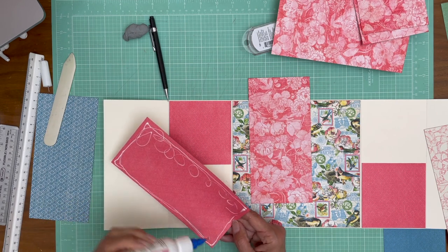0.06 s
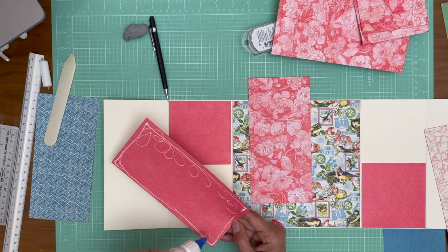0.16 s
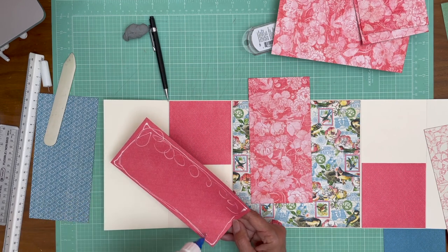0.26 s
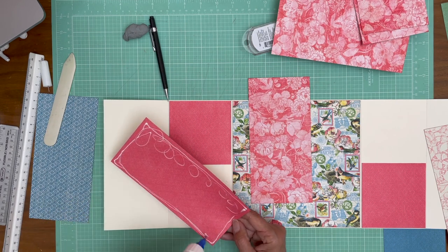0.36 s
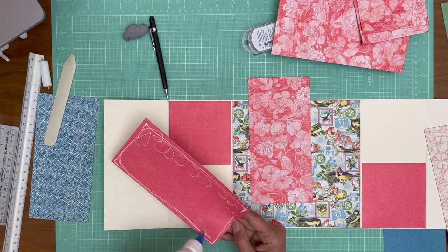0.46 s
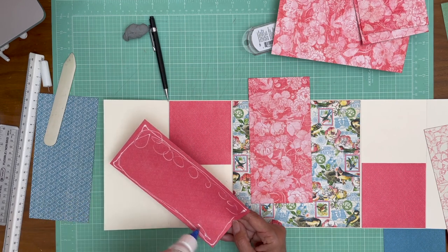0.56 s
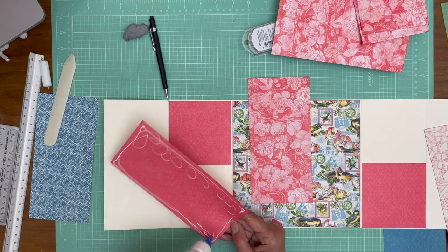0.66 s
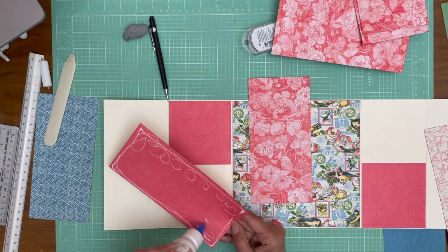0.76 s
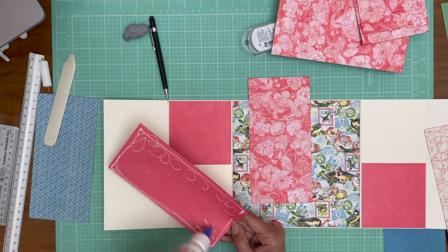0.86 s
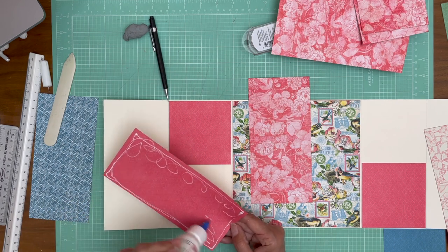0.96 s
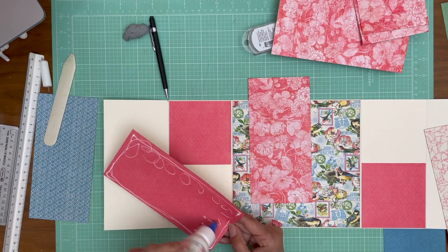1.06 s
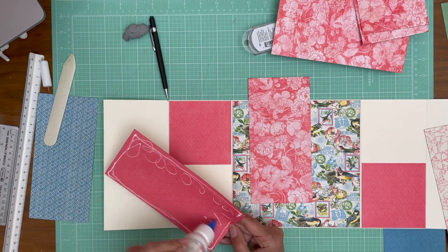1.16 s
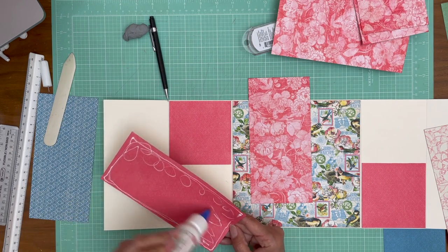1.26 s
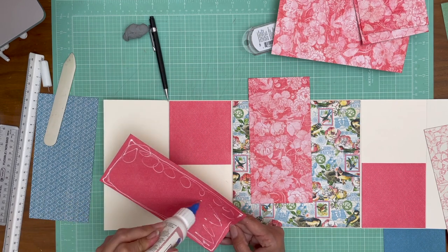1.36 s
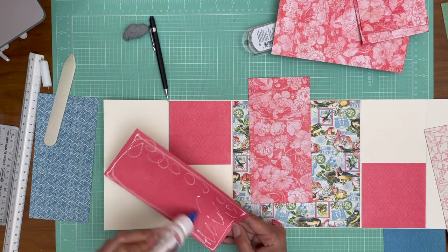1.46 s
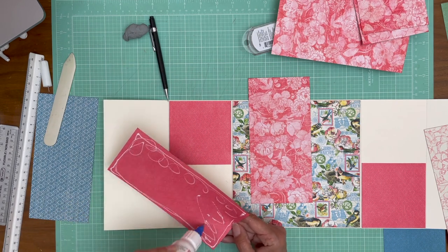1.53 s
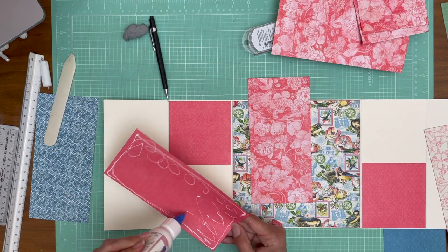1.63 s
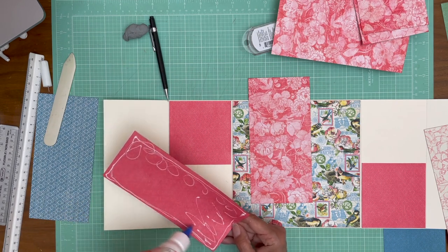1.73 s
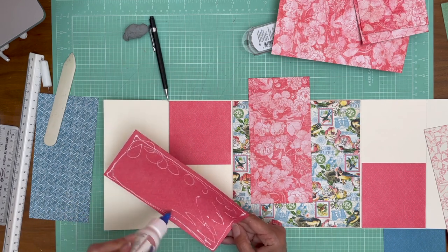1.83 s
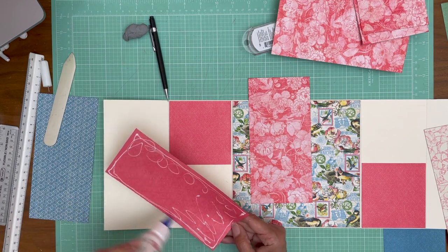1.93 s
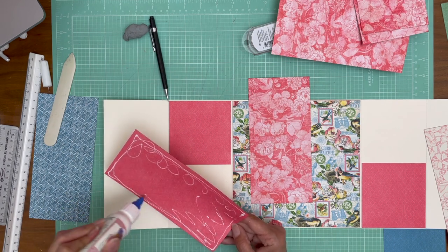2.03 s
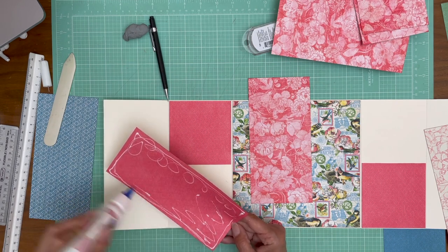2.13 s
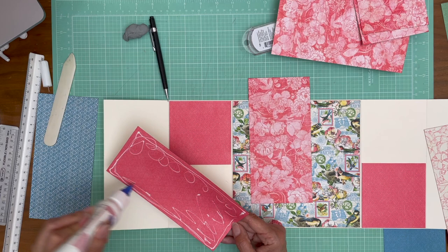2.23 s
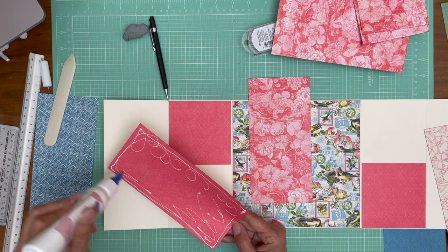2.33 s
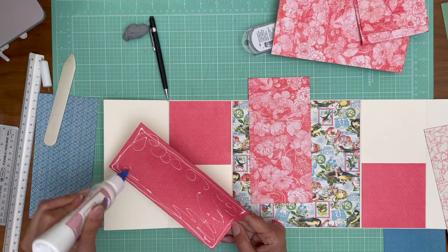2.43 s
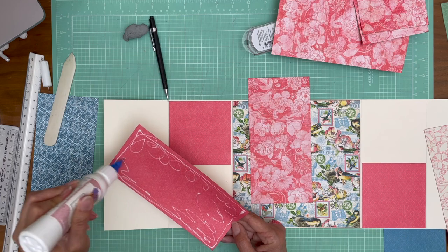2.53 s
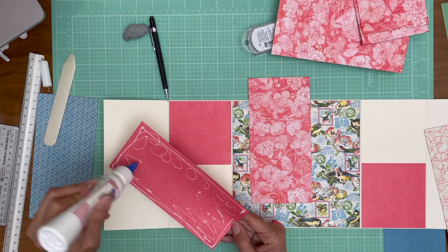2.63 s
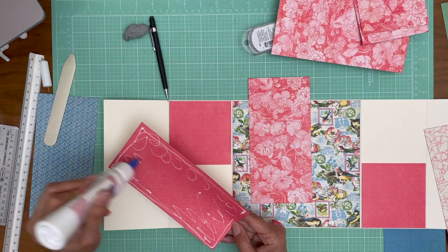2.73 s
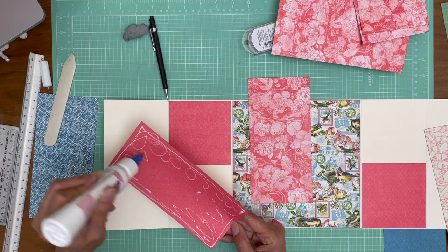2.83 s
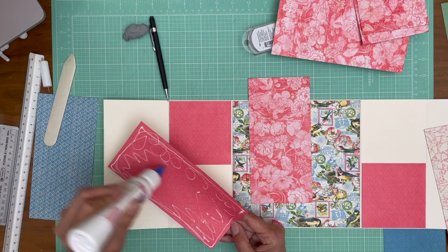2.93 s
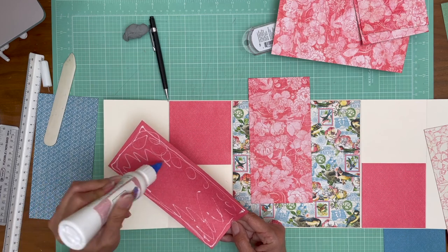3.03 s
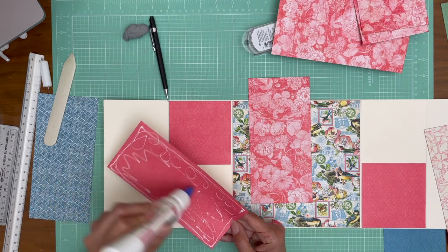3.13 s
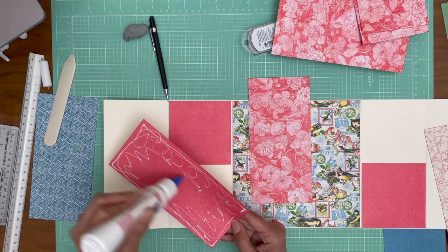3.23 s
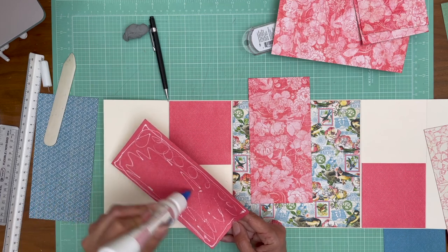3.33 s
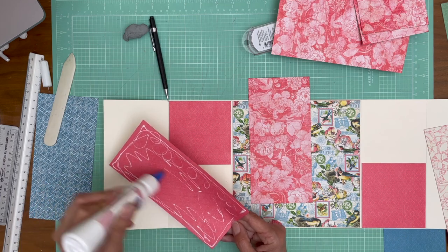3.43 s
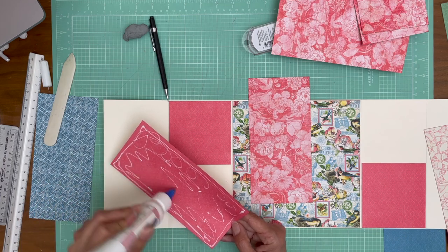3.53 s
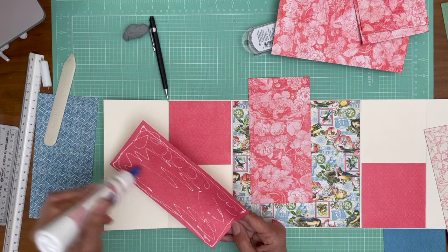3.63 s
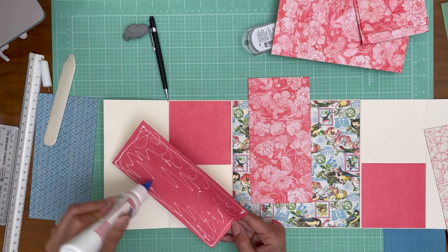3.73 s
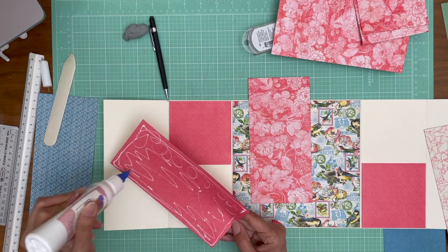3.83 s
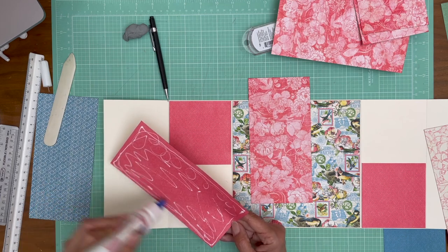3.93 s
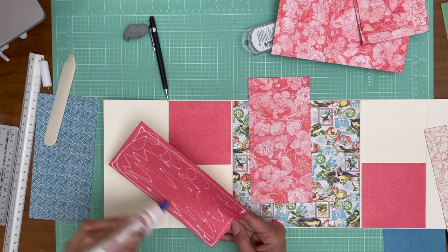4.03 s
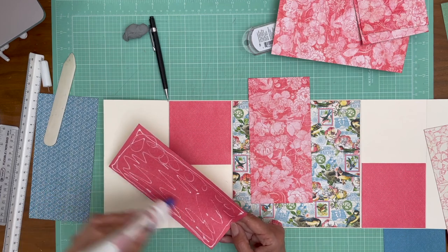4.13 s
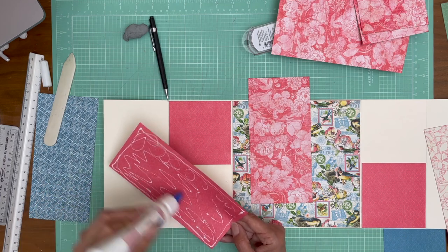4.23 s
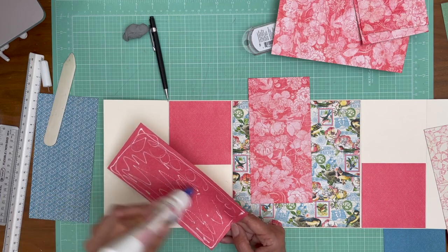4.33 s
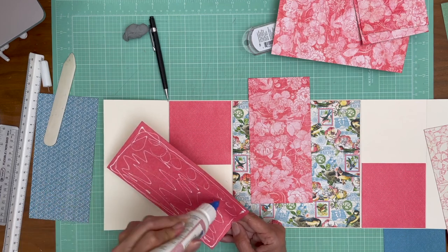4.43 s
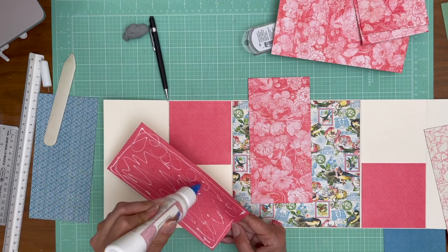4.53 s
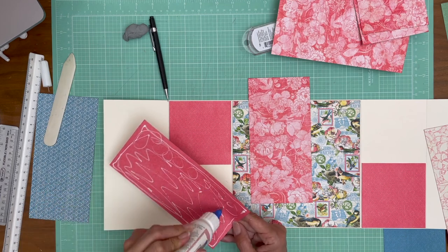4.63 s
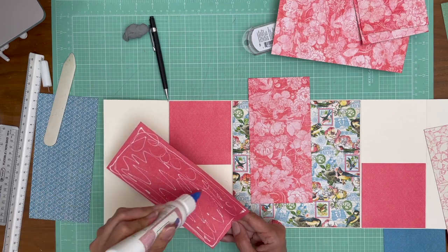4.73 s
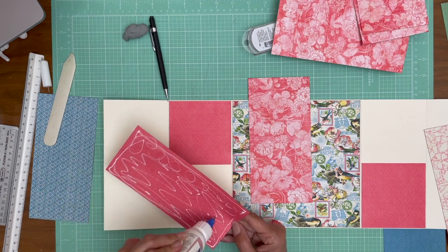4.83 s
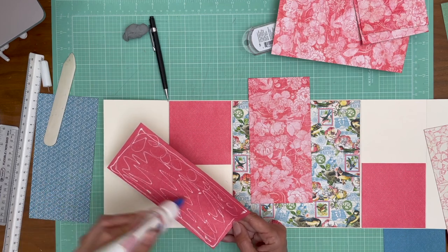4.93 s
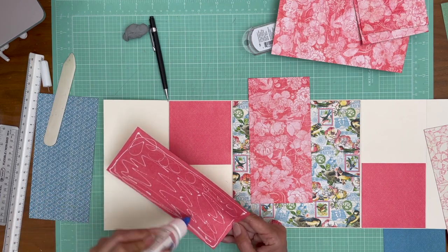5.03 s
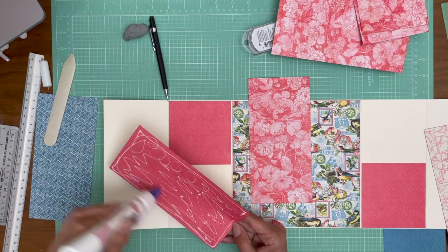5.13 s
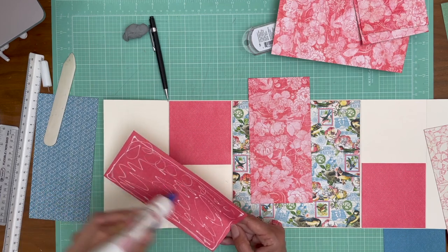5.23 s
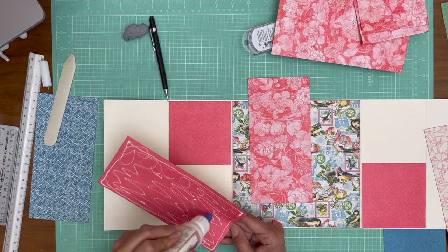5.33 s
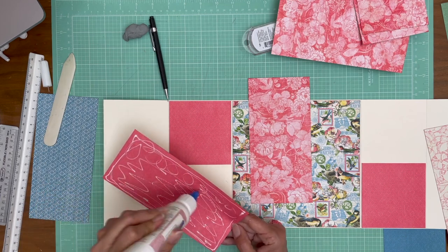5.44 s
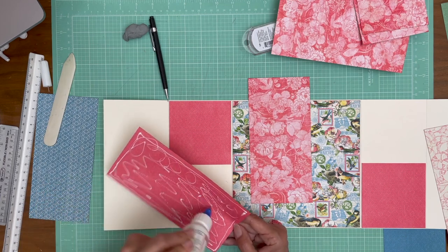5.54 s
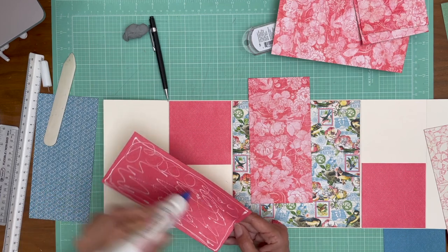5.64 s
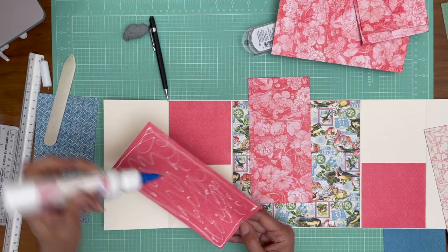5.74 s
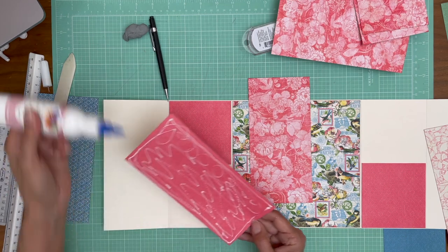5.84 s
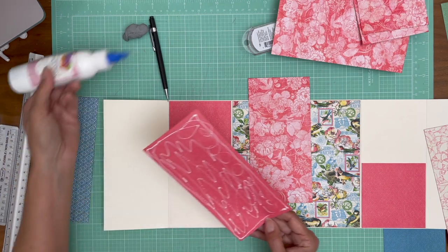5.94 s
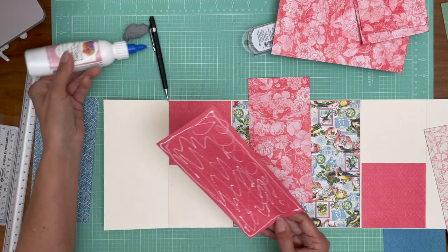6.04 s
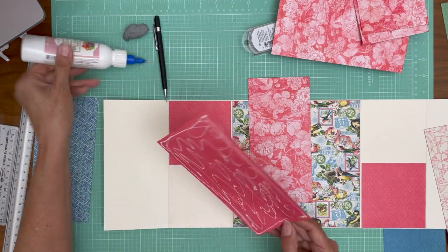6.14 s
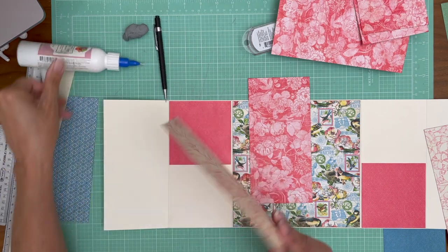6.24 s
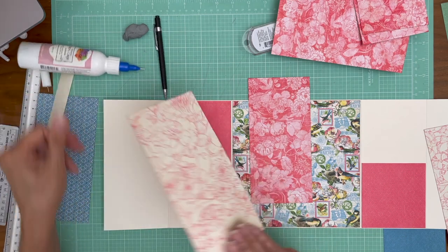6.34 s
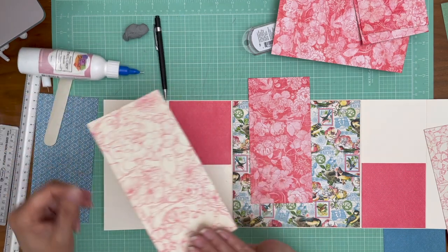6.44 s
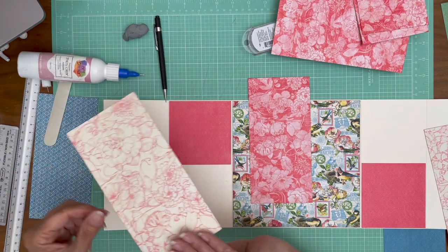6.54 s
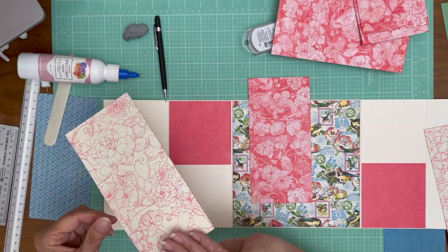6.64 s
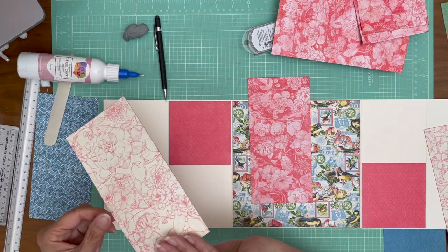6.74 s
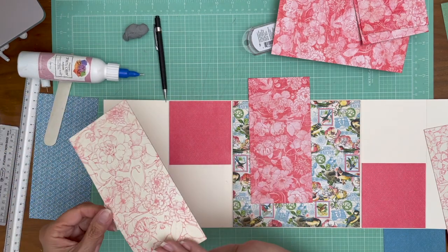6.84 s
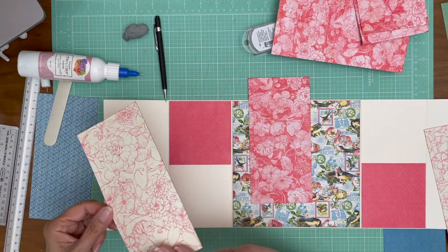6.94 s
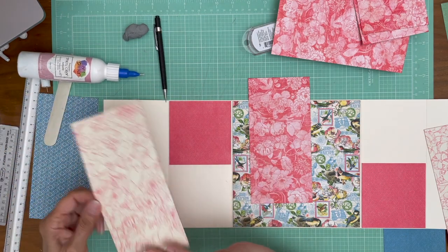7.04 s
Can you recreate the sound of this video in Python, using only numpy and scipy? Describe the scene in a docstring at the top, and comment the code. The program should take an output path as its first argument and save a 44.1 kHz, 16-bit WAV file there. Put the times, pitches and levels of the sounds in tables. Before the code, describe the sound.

Rapid dry scratching of a glue bottle tip on card in a quiet room, ending with a clattering set-down and light paper handling.

```python
"""A craft table in a quiet small room, heard from above by a pair of close microphone ports.
A fine plastic bottle tip scribbles glue over a strip of card, about ten short strokes a second: noise through
resonances, driven by the speed of the tip. The bottle is then laid on a hard folding tool: a touch, a thud and
three sharp knocks, made of ringing modes, chatter and short noise. Hands and card rustle, and light taps tick."""
import sys
import numpy as np
from scipy import signal
from scipy.fft import rfft, irfft, next_fast_len
from scipy.io import wavfile
from scipy.ndimage import uniform_filter1d

SR = 44100
rng = np.random.default_rng(int(sys.argv[2]) if len(sys.argv) > 2 else 0)


def materialize(psi):
    """Save the field psi as 16-bit PCM at rate SR to the path in sys.argv[1].

    A 1-D psi becomes a single channel; in a 2-D psi each row is a channel.
    """
    bounded = np.clip(np.atleast_2d(psi).T, -1, 1)
    quanta = np.round(bounded * 32767).astype(np.int16)
    wavfile.write(sys.argv[1], SR, quanta)


N = 312669  # length in samples


def amp(db):
    """Turn decibels into a gain."""
    return 10 ** (np.asarray(db) / 20)


def rms_one(x):
    """Scale a sound to an average (rms) strength of 1."""
    return x / np.sqrt(np.mean(x ** 2) + 1e-20)


def low_pass(x, order, hz):
    """Keep what lies below a frequency."""
    return signal.sosfilt(signal.butter(order, hz, fs=SR, output="sos"), x)


def high_pass(x, order, hz):
    """Keep what lies above a frequency."""
    return signal.sosfilt(signal.butter(order, hz, "high", fs=SR, output="sos"), x)


def drift(rate):
    """Wander at random with spread 1, heading for a new value about rate times a second."""
    knots = rng.standard_normal(int(N / SR * 60) + 2)
    position = np.arange(N) / SR * np.clip(rate, 1, 59)
    return np.interp(position, np.arange(len(knots)), knots)


def through(x, gain_at):
    """Filter by a gain, possibly complex, given as a function of frequency."""
    size = next_fast_len(N + SR)
    hz = np.arange(size // 2 + 1) * SR / size + 1e-3
    return irfft(rfft(x, size) * gain_at(hz), size)[..., :N]


def catches(per_s, spread_db):
    """Tiny random catches and releases on paper fibres; a wider spread adds a few large ones."""
    sizes = amp(spread_db * np.minimum(rng.exponential(1, N), 5)) * rng.standard_normal(N)
    return sizes * (rng.random(N) < per_s / SR) + 1e-18


def resonate(x, modes, shifting_db, glide=1):
    """Resonances side by side, retuned together by glide; their balance shifts while loudness stays steady."""
    out, glide = 0, glide * np.ones(N)
    for k, (hz, width_hz, level_db) in enumerate(modes):
        r, tone, state = np.exp(-np.pi * width_hz / SR), np.zeros(N), np.zeros(2)
        for i in range(0, N, 512):  # retune block by block
            poles = [1, -2 * r * np.cos(2 * np.pi * hz * glide[i] / SR), r * r]
            tone[i:i + 512], state = signal.lfilter([1 - r * r, 0, r * r - 1], poles, x[i:i + 512], zi=state)
        level = amp(level_db + shifting_db * drift(25.0))
        out = out + (-1) ** k * level * tone
    return out / np.sqrt(uniform_filter1d(out ** 2, size=SR // 40) + 1e-20)


def ring(clicks, hz, t60):
    """A click of size 1 sets off a sine of about height 1 that fades by 60 dB in t60 seconds."""
    r, w = amp(-60 / (t60 * SR)), 2 * np.pi * hz / SR
    return signal.lfilter([0, np.sin(w)], [1, -2 * r * np.cos(w), r * r], clicks + 1e-18)


def struck(times_s, gains):
    """Single clicks at given moments."""
    clicks = np.zeros(N)
    clicks[np.round(np.asarray(times_s) * SR).astype(int)] = gains
    return clicks


def dying(clicks, t60):
    """An envelope that jumps at each click and dies away."""
    return signal.lfilter([1], [1, -amp(-60 / (t60 * SR))], clicks + 1e-18)


STEADINESS = 2.3  # higher keeps the speed flatter in mid-movement


def hump(s, half_ms):
    """Speed of one hand movement: up, steady, down."""
    near = slice(max(int((s - .3) * SR), 0), min(int((s + .3) * SR), N))
    t = np.arange(near.start, near.stop) / SR
    return near, t, np.exp(-np.abs(1000 * (t - s) / half_ms) ** STEADINESS)


# tone colour of the quiet room: f/Hz, relative level/dB
QUIET_COLOUR = [(25, -48.5), (45, 4), (70, -4.5), (110, -0.5), (170, -10), (300, -8), (700, -17),
                (1500, -27), (4000, -34.5), (9000, -41), (13000, -28)]
# table shaking under the hands: t/s, low rumble level/dB relative to its plain level
TABLE_SHAKING = [(0, 4.5), (2.3, 3), (2.9, 10.5), (3.1, 5), (4.9, 3), (5.75, 8.5), (6.0, 2.5), (6.151, 15),
                 (6.55, 8.5), (6.97, 0.5), (7.04, 18), (7.09, 5)]
ROOM_TONE_DB, TONE_UNSHARED, RUMBLE_TOP_HZ = -50, 1, 252  # unshared: each port's own noise against the common one


def room_tone():
    """Low rumble of the room, stronger when the strokes and knocks shake the table, and faint hiss: partly
    shared noise at the two ports."""
    hz, level_db = np.transpose(QUIET_COLOUR)
    white = rng.standard_normal(N) + TONE_UNSHARED * rng.standard_normal((2, N))
    tone = rms_one(through(white, lambda f: amp(np.interp(np.log(f), np.log(hz), level_db))))
    low = through(tone, lambda f: 1 / (1 + (f / RUMBLE_TOP_HZ) ** 4))
    shaking_db = np.interp(np.arange(N) / SR, *np.transpose(TABLE_SHAKING))
    wandering = amp(ROOM_TONE_DB + 0.5 * drift(1.5))
    return wandering * (tone + (amp(shaking_db) - 1) * low)


ROOM_T60_S, ROOM_CUT_HZ = 0.26, 4220  # time to fade by 60 dB; treble limit


def room(x):
    """Scattered reflections, different at each port, dull and dying evenly."""
    t = np.arange(SR // 2) / SR
    echoes = rng.standard_normal((2, len(t))) * amp(-60 * t / ROOM_T60_S) * (t > .002)
    echoes = low_pass(echoes, 2, ROOM_CUT_HZ)
    echoes /= np.sqrt(np.sum(echoes ** 2, axis=1, keepdims=True))
    return signal.fftconvolve(x[None], echoes, axes=1)[:, :N]


SHARED_BELOW_HZ = 280


def alike_in_bass(pair):
    """Long waves reach both ports alike, so remove the left-right difference in the bass."""
    side = high_pass((pair[0] - pair[1]) / 2, 2, SHARED_BELOW_HZ)
    return (pair[0] + pair[1]) / 2 + side * [[1], [-1]]


# hands and card brushing: middle t/s, half length/ms, bright rustle level/dB, dull rub level/dB
BRUSHES = [(.03, 130, -52.5, -59), (.098, 19, -44, -78), (5.68, 83, -45, -51), (5.78, 38, -41.5, -51),
           (5.928, 95, -48, -55.5), (6.031, 80, -69, -46.5), (6.1, 36, -42, -47), (6.169, 48, -43, -41.5),
           (6.82, 21, -58, -54), (6.95, 55, -64.5, -58), (7.034, 38.5, -41, -54)]
# colours of the bright rustle and the dull rub: f/Hz, width/Hz, relative level/dB
BRIGHT_MODES = [(3830, 2000, -6), (7150, 210, 3), (10600, 4200, -3.5), (13100, 2300, -1)]
DULL_MODES = [(450, 930, -2), (774, 770, 6), (1050, 280, 2), (1640, 300, -12.5)]


def rustle():
    """Skin and card sliding: bright grains and a duller rub, both following the speed of the hand."""
    power = np.zeros((2, N))
    for s, half_ms, bright_db, rub_db in BRUSHES:
        near, _, speed = hump(s, half_ms)
        power[:, near] += (amp([[bright_db], [rub_db]]) * speed) ** 2
    bright = resonate(catches(11000.0, 1.4), BRIGHT_MODES, 0.4)
    rub = resonate(catches(3300.0, 1.4), DULL_MODES, 4.8)
    return np.sum(np.sqrt(power) * [bright, rub], axis=0)


# light taps on the card: t/s, level/dB of the main pitch, main pitch f/Hz
LIGHT_TAPS = [(.925, -35, 1520), (6.751, -40, 1530), (6.758, -38, 1480), (6.802, -29.5, 1510),
              (7.032, -30.5, 560), (7.034, -38, 1770)]


def taps():
    """Short damped ticks at the card's pitch, with an undertone and two overtones, softened by the contact."""
    ticks = np.zeros(N)
    for s, level_db, hz in LIGHT_TAPS:
        click = struck([s], amp(level_db))
        for ratio, share in [(.45, -0.67), (1, 1), (1.95, 0.16), (2.7, -0.11)]:
            ticks += share * ring(click, ratio * hz, 23.0 / hz)  # fades by 60 dB in 23 cycles of the main pitch
    return low_pass(ticks, 2, 7000)


# the bottle slides on the tool: middle t/s, half length/ms, level/dB
BOTTLE_SLIDES = [(6.01, 37, -50)]
# what the slide sets singing: f/Hz, width/Hz, relative level/dB
SINGING_MODES = [(1630, 110, 0), (3250, 90, -8), (4400, 90, -3)]


def slide():
    """The bottle brushes the tool before it lands: steady noise makes a few thin modes sing faintly."""
    gain = np.zeros(N)
    for s, half_ms, level_db in BOTTLE_SLIDES:
        near, _, speed = hump(s, half_ms)
        gain[near] += amp(level_db) * speed
    return gain * resonate(rng.standard_normal(N), SINGING_MODES, 1)


# bottle against tool and table:
# t/s, relative blow level/dB, favoured pitch f/Hz, table thud level/dB, relative crack level/dB
BLOWS = [(6.03, -33, 2570, -39, -30), (6.067, -15.5, 573, -26, -12), (6.225, -2.5, 493, -20.5, -19),
         (6.247, -0.5, 1520, -8.5, 3), (6.331, 2, 2410, -10, 2.5), (6.373, -5.5, 2700, -10, -1),
         (6.378, -0.5, 5330, -34.5, 3)]
# ringing of bottle and tool: f/Hz, level/dB when struck, 60 dB fading time/s, level/dB when chattering
BOTTLE_MODES = [(350, 4, 0.04, 4), (424, 4, 0.047, 4), (565, 1.5, 0.02, 3), (945, 4, 0.05, 6),
                (1223, 10, 0.015, 6), (1480, 8, 0.024, 4), (1760, 4.5, 0.023, 7), (2490, 12, 0.022, 0),
                (2820, -3, 0.03, 2), (3330, 3, 0.035, 3), (4265, -2, 0.04, 2), (4700, 8, 0.016, -4),
                (5370, 4, 0.05, 2), (6400, -3, 0.045, 2)]
# ringing of the table: f/Hz, relative level/dB, 60 dB fading time/s
TABLE_MODES = [(96, -9, 0.15), (165, -7, 0.071), (237, 3.5, 0.06)]
CLATTER_PER_S, CLATTER_DB, CLATTER_T60_S = 700, -18.5, 0.29  # the bottle chatters on after each blow
RATTLE_DAMPING = 0.38  # loose chatter rings for this share of the free fading time
THUD_MS, TABLE_LOW_HZ = 6.1, 62  # length of the push on the table; little is radiated below this pitch
CRACK_T60_S = 0.015
SIZZLE_DB, SIZZLE_T60_S, SIZZLE_LOW_HZ = -25, 0.21, 8980  # the crack leaves a thin bright tail


def knocks():
    """Every blow strikes the same modes, those near its favoured pitch hardest; then clatter, thud and crack."""
    s, blow_db, favoured_hz, thud_db, crack_db = np.transpose(BLOWS)
    out, chatter = np.zeros(N), rng.random(N) < CLATTER_PER_S / SR
    for k, (hz, level_db, t60, loose_db) in enumerate(BOTTLE_MODES):
        octaves_away = np.log2(hz / favoured_hz)
        blows = (-1) ** k * struck(s, amp(blow_db - 16.5 - 5.3 * octaves_away ** 2))
        fading = amp(CLATTER_DB + loose_db) * dying(blows, CLATTER_T60_S)
        rattle = fading * chatter * rng.standard_normal(N)
        out += amp(level_db) * ring(blows, hz, t60) + ring(rattle, hz, RATTLE_DAMPING * t60)

    push = np.hanning(int(THUD_MS / 1000 * SR))
    thuds = signal.fftconvolve(struck(s, amp(thud_db)), push / push.sum())[:N]
    out += sum(amp(level_db) * ring(thuds, hz, t60) for hz, level_db, t60 in TABLE_MODES)
    out = high_pass(out, 3, TABLE_LOW_HZ)

    cracks, noise = struck(s, amp(crack_db)), rng.standard_normal(N)
    crack = 0.66 * dying(cracks, CRACK_T60_S) * noise
    sizzle = amp(SIZZLE_DB) * dying(cracks, SIZZLE_T60_S) * high_pass(noise, 2, SIZZLE_LOW_HZ)
    return out + crack + sizzle


# strokes of the tip: fastest moment t/s, half length/ms, scrape level/dB, hiss level/dB against the scrape,
# centre of the scrape f/Hz
GLUE_STROKES = [(0.395, 35, -46.5, -2.5, 1320), (0.49, 38, -33.5, -6, 1400), (0.617, 47, -31, -6, 1380),
                (0.7, 30.4, -22.5, -5.5, 1890), (0.766, 110, -36.5, -5, 1530),
                (0.866, 32, -29.5, -5.5, 1700), (0.995, 52, -30, -12, 1720), (1.098, 31, -39, -1.5, 1470),
                (1.173, 25.6, -34.5, -6.5, 1340), (1.278, 33.3, -34.5, 3.5, 1430),
                (1.487, 43.4, -26, -10.5, 1370), (1.616, 41.6, -30.5, -4.5, 1570),
                (1.692, 23, -26, -14.5, 1520), (1.788, 49, -27.5, -9.5, 1430),
                (1.882, 43, -32.5, -9.5, 1200), (1.956, 85, -28.5, -7.5, 1410),
                (2.151, 38, -31, -3.5, 1270), (2.236, 22, -30, -5.5, 1500), (2.325, 51, -38.5, -5, 1420),
                (2.401, 19, -33.5, -10, 1570), (2.509, 76, -35, -10.5, 1530), (2.575, 24, -27.5, -6, 1720),
                (2.678, 30, -40.5, -7, 1390), (2.751, 22.2, -27, -8, 1600), (2.827, 48, -34.5, -9.5, 1450),
                (2.927, 33.7, -28.5, 1.5, 1530), (3.02, 39, -41, -12, 1230), (3.12, 36, -24, 0, 1530),
                (3.224, 56, -27.5, -9, 1500), (3.327, 29.5, -24.5, -12.5, 1600),
                (3.428, 44.5, -23.5, -8.5, 1360), (3.518, 27, -25, -10, 1470), (3.624, 47, -24, -5.5, 1480),
                (3.72, 26, -28.5, -5.5, 1360), (3.835, 68, -29.5, -2.5, 1330),
                (3.928, 56.5, -24.5, -4.5, 1480), (4.063, 29, -26, -7.5, 1370),
                (4.153, 43.5, -22.5, -6.5, 1620), (4.255, 34.5, -27.5, -6.5, 1460),
                (4.365, 54.3, -25, 1.5, 1530), (4.498, 31.6, -25.5, 0.5, 1400),
                (4.6, 40.7, -24.5, -0.5, 1570), (4.714, 44, -30.5, 5.5, 1520), (4.783, 5.8, -30, 0, 1640),
                (4.817, 25.5, -27.5, -2.5, 1650), (4.927, 56, -27, -2, 1570), (5.026, 22, -22, -15, 1630),
                (5.126, 47.5, -26.5, 0.5, 1460), (5.262, 63, -24.5, 0.5, 1570),
                (5.405, 45.5, -29.5, 2, 1550), (5.524, 30.3, -28, -2.5, 1490), (5.62, 34, -33, -1.5, 1590)]
# moments when the tip comes down already moving, and when it leaves the card still moving: t/s
TOUCHDOWNS = [0.681, 0.756, 0.845, 0.995, 1.428, 1.947, 3.081, 4.045, 4.804]
LIFT_OFFS = [0.406, .888, 3.844, 4.792, 5.628]
# what the tip sets ringing (nozzle, upper rasp, paper hiss, boom of the card): f/Hz, width/Hz, relative level/dB
NOZZLE_MODES = [(1096, 312, 1), (1332, 380, 3.5), (1654, 366, -1.5)]
RASP_MODES = [(2050, 240, -0.5), (2960, 670, -2), (3360, 860, -5)]
HISS_MODES = [(4220, 1000, -1), (7390, 1000, 5.5), (10480, 740, 1.5), (13200, 3400, 0.5)]
BOOM_MODES = [(464, 250, -1.5), (905, 113, 3)]
CATCHES_PER_S, CATCH_SPREAD_DB, SHIFTING_DB = 3000.0, 0, 5.5
CONTACT_MS = 5  # time to land or lift
REST_HZ, NOZZLE_LOW_HZ = 1433, 860  # centre the nozzle modes are listed at; the small tip radiates little below
RASP_DB, RASP_FOLLOWS = -4, 0.51  # the upper rasp also rises with the hiss
BOOM_DB, BOOM_FOLLOWS = -24.5, 0.53  # the card booms more evenly than the tip scrapes


def tip():
    """Each stroke speeds up and slows down; speed drives scrape, rasp, hiss and card boom together."""
    power, centre = np.full((4, N), 1e-12), np.full(N, 1e-12 * REST_HZ)
    for s, half_ms, level_db, hiss_db, hz in GLUE_STROKES:
        near, t, speed = hump(s, half_ms)
        for edge in TOUCHDOWNS:
            if s - half_ms / 500 < edge < s + .004:
                speed = speed * np.clip(1000 * (t - edge) / CONTACT_MS + 1, 0, 1)
        for edge in LIFT_OFFS:
            if s < edge < s + half_ms / 1000:
                speed = speed * np.clip(1000 * (edge - t) / CONTACT_MS + 1, 0, 1)
        rasp_db = level_db + RASP_DB + RASP_FOLLOWS * hiss_db
        boom_db = BOOM_DB + BOOM_FOLLOWS * level_db
        parts_db = [[level_db], [rasp_db], [level_db + hiss_db], [boom_db]]
        # hiss needs speed most, the boom of the card least
        power[:, near] += (amp(parts_db) * speed ** np.array([[1], [1.05], [1.1], [.7]])) ** 2
        centre[near] += hz * (amp(level_db) * speed) ** 2

    grit = catches(CATCHES_PER_S, CATCH_SPREAD_DB)
    slip = np.std(grit) * rng.standard_normal((2, N))  # smooth sliding between the catches
    glide = centre / power[0] / REST_HZ  # the loudest stroke has most say in the colour
    thin = high_pass(grit + 0.79 * slip[0], 2, NOZZLE_LOW_HZ)
    scrape = resonate(thin, NOZZLE_MODES, SHIFTING_DB, glide)
    rasp = resonate(thin, RASP_MODES, SHIFTING_DB, np.sqrt(glide))
    hiss = resonate(grit + 6.6 * slip[1], HISS_MODES, 5.3)
    boom = resonate(slip[1], BOOM_MODES, 9.2)
    return np.sum(np.sqrt(power) * [scrape, rasp, hiss, boom], axis=0)


SCRAPE_ROOM_DB, KNOCK_ROOM_DB = -13, -4  # how strongly each kind of sound feeds the reflections


def scene():
    """Table-top sounds, their reflections and the room tone."""
    sliding, blows = tip() + rustle() + taps() + slide(), knocks()
    reflections = room(amp(SCRAPE_ROOM_DB) * sliding + amp(KNOCK_ROOM_DB) * blows)
    return sliding + blows + alike_in_bass(reflections + room_tone())


# how far the left port's phase leads: f/Hz, lead/radians
PHASE_LEAD = [(0, 0), (2000, .3), (3100, 1.5), (5200, 1.0), (5800, -1.2), (8500, -3.14), (11500, -5.7),
              (13000, -6.28)]
# how much louder the left port is: f/Hz, level/dB
LEVEL_LEAD = [(60, 1.7), (700, 3), (3500, 4.5), (8000, 0)]
MIC_LOW_HZ, MIC_HIGH_HZ, CUTOFF_HZ = 42, 12950, 16050  # bass roll-off, treble roll-off, steep top cut


def record(dry):
    """The two ports differ in phase and level with frequency; peaks are rounded, the top is cut."""
    def ports(f):
        """Share the level difference equally; give the phase lead to the left."""
        lead = np.interp(f, *np.transpose(PHASE_LEAD))
        half = amp(np.interp(f, *np.transpose(LEVEL_LEAD)) / 2)
        return np.array([half * np.exp(1j * lead), 1 / half])
    heard = high_pass(through(dry, ports), 2, MIC_LOW_HZ)
    heard = low_pass(heard, 3, MIC_HIGH_HZ)
    rounded = 1.238 * np.tanh(heard / 1.058)
    return signal.sosfilt(signal.cheby2(24, 70, CUTOFF_HZ, fs=SR, output="sos"), rounded)


dry = scene()
out = record(dry)
materialize(out)
```